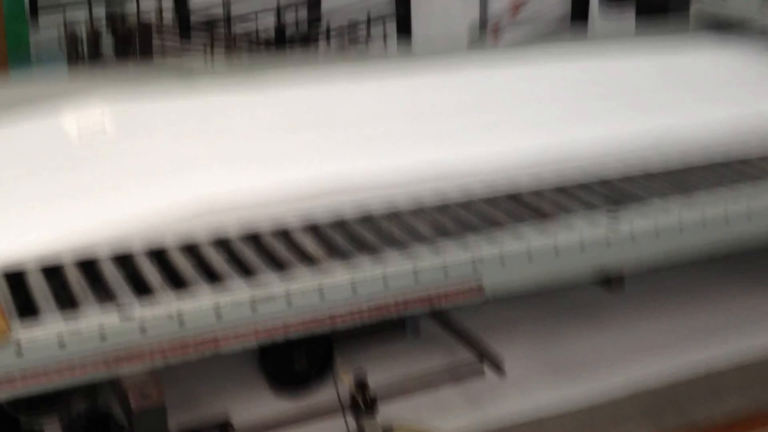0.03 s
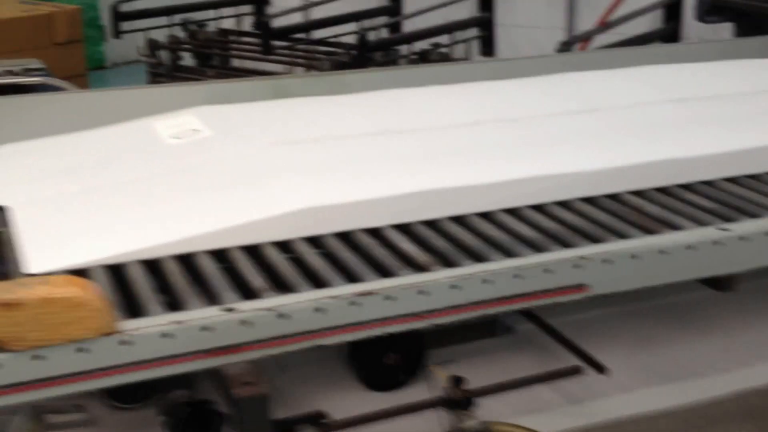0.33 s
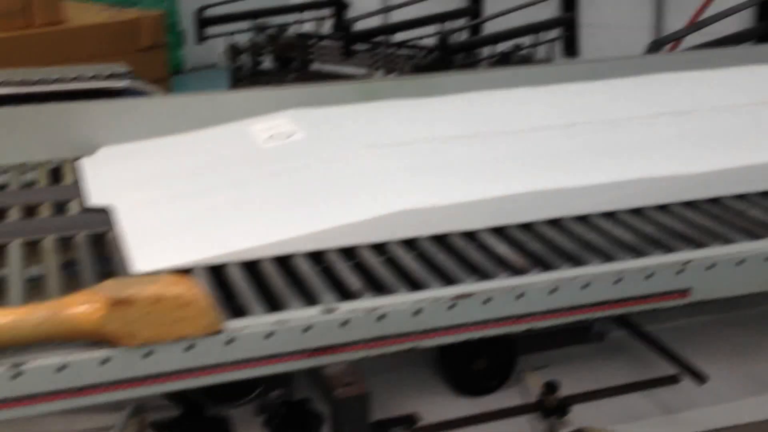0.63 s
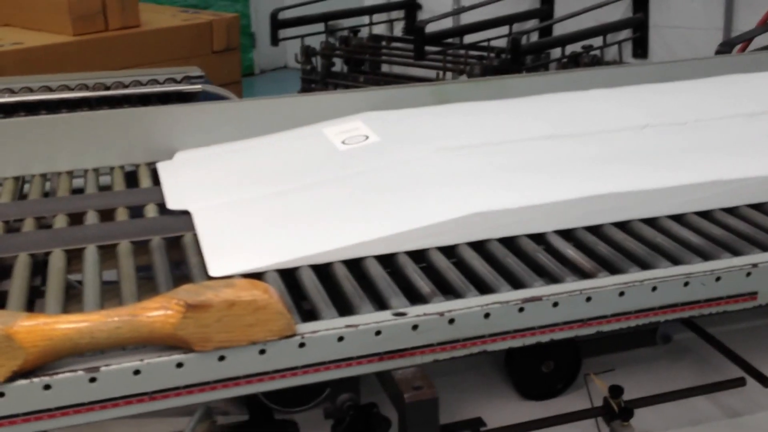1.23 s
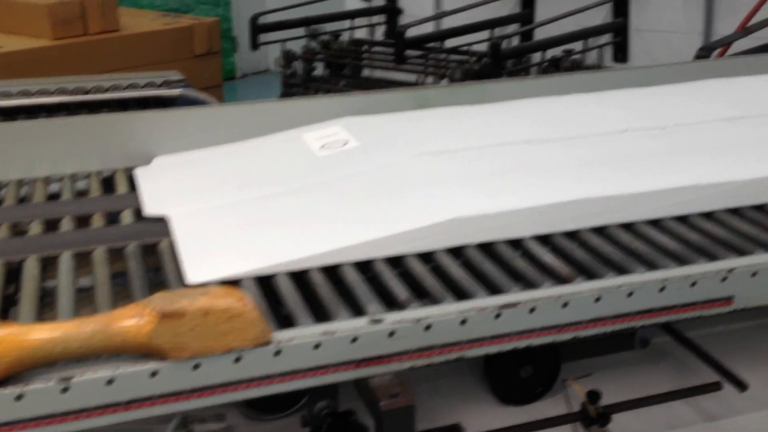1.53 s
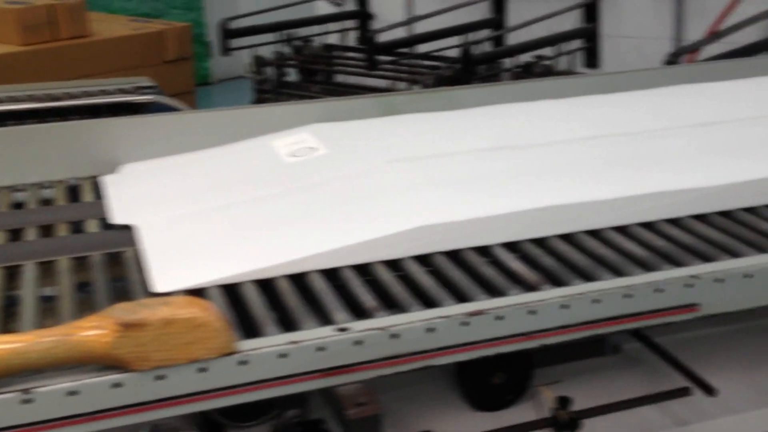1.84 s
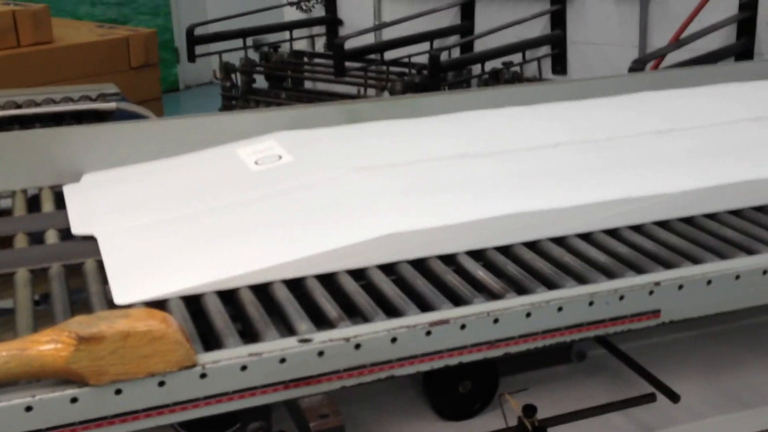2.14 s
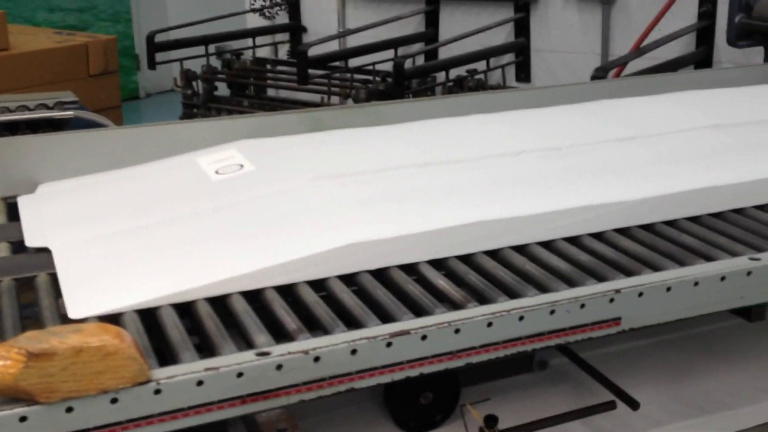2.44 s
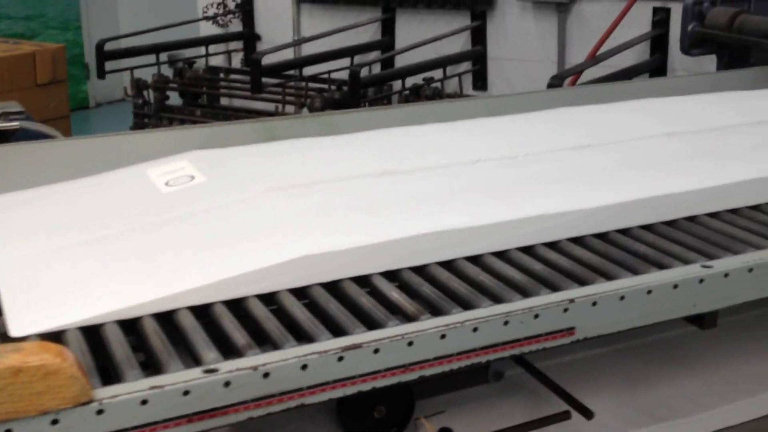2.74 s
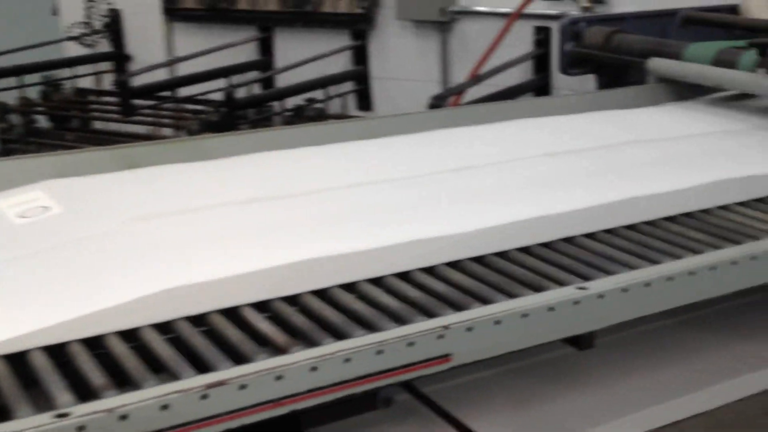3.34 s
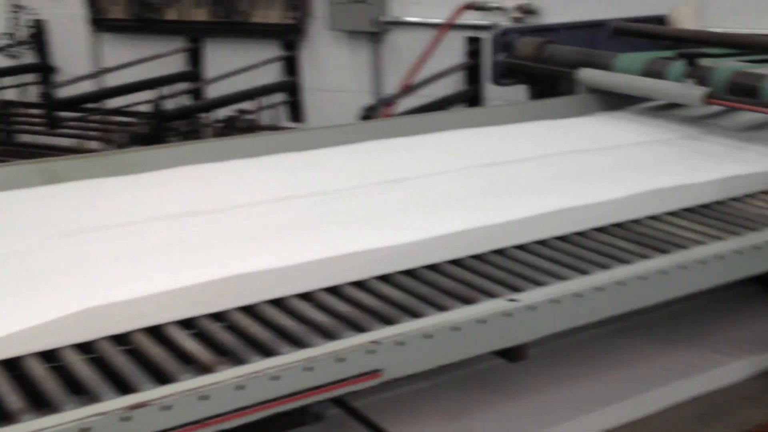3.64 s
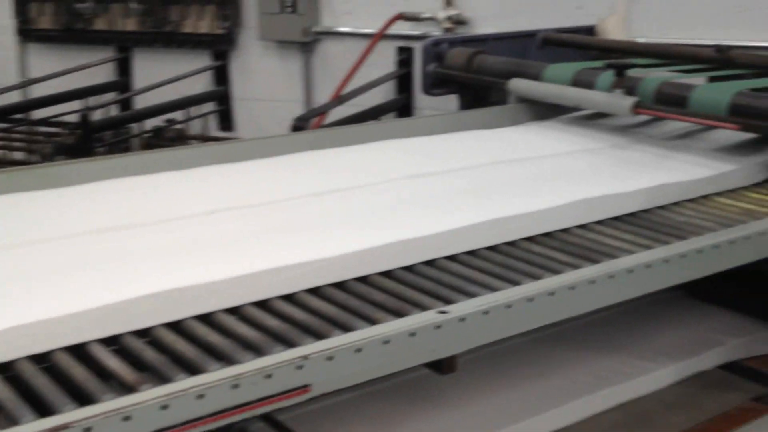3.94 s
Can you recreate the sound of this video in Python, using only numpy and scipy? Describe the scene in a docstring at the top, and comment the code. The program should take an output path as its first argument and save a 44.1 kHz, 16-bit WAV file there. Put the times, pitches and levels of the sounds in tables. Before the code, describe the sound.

A paper folding machine runs with a rhythmic steel clack over rattling rollers.

```python
"""A print shop, one microphone beside the roller table of a paper folding machine.
It takes a sheet every 0.6 s: a dry snap, then a clatter of ringing steel, each with a swish of paper.
Sheet edges flick against the rollers, which rush, tick and rattle throughout over the drive's hum.
Past the middle a low fluttering rumble swells, with dull knocks and soft bumps."""
import sys
import numpy as np
from scipy import signal
from scipy.fft import rfft, irfft
from scipy.io import wavfile

SR = 44100
rng = np.random.default_rng(int(sys.argv[2]) if len(sys.argv) > 2 else 0)


def log_audio(samples):
    """Write samples as a 16-bit WAV file to the path given in sys.argv[1]."""
    # one column per channel
    frames = np.atleast_2d(samples).T
    # limit to full scale, then quantise
    limited = np.clip(frames, -1, 1)
    pcm = np.round(limited * 32767).astype(np.int16)
    wavfile.write(sys.argv[1], SR, pcm)


N = 176400
T = np.arange(N) / SR
ATTACK_S = 0.00089


def from_db(db):
    """Decibels to gain."""
    return 10 ** (np.asarray(db) / 20)


def rms_one(x):
    """Scale to unit rms."""
    return x / np.sqrt(np.mean(x ** 2) + 1e-20)


def noise(colour):
    """Unit-rms noise with the given spectrum."""
    hz, db = np.transpose(colour)
    bins_hz = np.maximum(np.arange(N // 2 + 1) * SR / N, 1)
    gain = from_db(np.interp(np.log(bins_hz), np.log(hz), db))
    return rms_one(irfft(rfft(rng.standard_normal(N)) * gain, N))


def drift(rate_hz):
    """Unit-rms random wander, mostly slower than rate_hz."""
    bins_hz = np.arange(N // 2 + 1) * SR / N
    return rms_one(irfft(rfft(rng.standard_normal(N)) / (1 + (bins_hz / rate_hz) ** 2), N))


def impulses(times, db):
    """One impulse for each contact."""
    hits = np.zeros(N)
    np.add.at(hits, np.clip((times * SR).astype(int), 0, N - 1), from_db(db))
    return hits


def dying(hits, decay_s):
    """Envelope that jumps at each hit and falls to 1/e in decay_s."""
    power = signal.lfilter([1], [1, -np.exp(-2 / (decay_s * SR))], hits ** 2 + 1e-18)
    pole = np.exp(-1 / (ATTACK_S * SR))
    return np.sqrt(signal.lfilter([1 - pole], [1, -pole], power))


def burst(hits, colour, decay_s, tail_s, tail_db, grain_db):
    """A grainy crack followed by its smooth tail in the room."""
    crack = rms_one(noise(colour) * from_db(grain_db * drift(500))) * dying(hits, decay_s)
    return crack + from_db(tail_db) * noise(colour) * dying(hits, tail_s)


# Rollers and belts, from beside the table: (frequency [Hz], level [dB])
ROLLER_SPECTRUM = [(90,-13),(130,-2.5),(235,2),(350,-1.5),(440,-5),(750,-6.5),(1040,-3.5),(1250,-5),(1900,-1),(2900,-1),(3700,-4),(4400,-13.5),(5300,-7.5),(6400,-3),(7600,-2.5),(8600,-3),(9100,-12.5),(10400,-15.5),(12200,-8.5),(13200,-22.5),(15200,-21)]

def rollers(ticks_per_s=70, waver_db=0.6):
    """Running rollers and belts make a steady rush with many small dry ticks."""
    tick_hits = 1.0 * (rng.random(N) < ticks_per_s / SR)
    rush = from_db(-20.5 + waver_db * drift(13)) * noise(ROLLER_SPECTRUM)
    ticks = dying(tick_hits, decay_s=0.0032) * noise(ROLLER_SPECTRUM)
    return rush + from_db(-29) * rms_one(ticks)


# Tones of the drive: (frequency [Hz], level [dB])
DRIVE_TONES = [(302,-38.5),(981,-44)]

def drive_hum(pitch_waver=0.0064, waver_db=3):
    """The drive hums under the rollers, each tone wavering in level and pitch."""
    hum = 0
    for hz, db in DRIVE_TONES:
        level = from_db(waver_db * drift(2.7))
        phase = 2 * np.pi * hz * np.cumsum(1 + pitch_waver * drift(12.1)) / SR
        hum += from_db(db) * rms_one(level * np.sin(phase))
    return hum


def roller_pings(times, levels_db, centre_hz=2666, spread_octaves=0.28, t60_s=0.093):
    """Each touch rings a different roller, briefly and at its own pitch."""
    pings = np.zeros(N + SR)
    age = T[:int(t60_s * SR)]
    decay = np.exp(-np.log(1000) * age / t60_s)
    pitches = centre_hz * 2 ** (spread_octaves * np.clip(rng.standard_normal(len(times)), -2, 2))
    for start, db, hz in zip((times * SR).astype(int), levels_db, pitches):
        pings[start:start + len(age)] += from_db(db) * decay * np.sin(2 * np.pi * hz * age)
    return pings[:N]


def roller_rattle():
    """Loose rollers rattle at random, more often under a passing sheet."""
    pings_per_s = 45 * (1 + rms_one(sliding()))
    times = T[rng.random(N) < pings_per_s / SR]
    levels_db = 2 * rng.standard_normal(len(times))
    return from_db(-31) * rms_one(roller_pings(times, levels_db))


# Snaps, half a cycle from the steel clatter: (time [s], level [dB])
SNAP_HITS = [(.277,-2.5),(.8777,-2.5),(1.4717,-2),(2.0817,-1.5),(2.6676,-1.5),(3.2696,-1),(3.8687,-1)]
# A snap at the microphone: (frequency [Hz], level [dB])
SNAP_SPECTRUM = [(400,-2.5),(2600,0.5),(4400,-13),(7800,7),(9600,-8),(11200,0.5),(13000,-3.5),(15200,-12)]

def snaps():
    """One bright, unpitched snap for each sheet."""
    hits = impulses(*np.transpose(SNAP_HITS))
    snap = burst(hits, SNAP_SPECTRUM, decay_s=0.02, tail_s=0.074, tail_db=-9.5, grain_db=3.5)
    return from_db(-11) * snap


# The two slides of each cycle: (first peak [s], rise [s], fall [s], level [dB])
PAPER_SLIDES = [(0.299,0.036,0.1,-21.5),(0.676,0.083,0.061,-20.5)]

def sliding(cycle_s=0.598):
    """How strongly paper is sliding: two bell-shaped swells a cycle."""
    power = 0
    for first_peak, rise, fall, db in PAPER_SLIDES:
        from_peak = (T - first_peak + cycle_s / 2) % cycle_s - cycle_s / 2
        width = np.where(from_peak < 0, rise, fall)
        swell = from_db(db) * np.exp(-0.5 * (from_peak / width) ** 2)
        power += swell ** 2
    return np.sqrt(power)


# Sliding paper: (frequency [Hz], level [dB])
PAPER_SPECTRUM = [(300,-14.5),(1500,-4.5),(2200,1.5),(3300,1),(4400,-9),(6500,-2.5),(8400,-4.5),(15000,-30)]

def paper_swish(grain_db=1.8):
    """Sheets slide past the microphone in uneven swishes."""
    return sliding() * rms_one(noise(PAPER_SPECTRUM) * from_db(grain_db * drift(41)))


# Sheet edges meeting the rollers: (time [s], level [dB])
FLICK_HITS = [(0.304,3),(1.262,4),(2.068,-2),(2.455,-1),(3.087,1),(3.344,-3),(3.618,-2),(3.691,-1),(3.938,-1.5)]
# The slap of an edge: (frequency [Hz], level [dB])
FLICK_SPECTRUM = [(1200,-12),(2500,-0.5),(3300,-1.5),(5000,-19)]

def edge_flicks(rollers_hit=4, slap_s=0.018):
    """A sheet's edge slaps down and rings a few rollers in quick succession."""
    hits = impulses(*np.transpose(FLICK_HITS))
    slap = from_db(-17.5) * noise(FLICK_SPECTRUM) * dying(hits, slap_s)
    times, db = np.repeat(FLICK_HITS, rollers_hit, axis=0).T
    touches = times + slap_s * rng.random(len(times))
    return slap + roller_pings(touches, db - 25.5)


# Steel contacts of the feed: (time [s], crack level [dB], ring level [dB])
FEED_CONTACTS = [(0.371,-25,-5),(0.546,-2.5,0),(0.558,-1,6.5),(0.574,0,-4),(.658,-4,2),(.968,-22,-5.5),
                 (1.138,-16,-5),(1.154,0,-8),(1.165,-4,-14),(1.181,-3,-13),(1.231,-14,2.5),(1.257,-16,-2),(1.270,-10,-8),(1.294,-6,-15),
                 (1.739,-3.5,-12),(1.759,-6,-8),(1.767,0,-1.5),(1.858,-9,2),(1.865,-12,-7),(1.884,-8,-5),
                 (2.344,-3.5,3),(2.368,0.5,-11),(2.431,-3,4),(2.459,-1.5,-17),
                 (2.941,-4,0),(2.956,-3,2.5),(2.972,-0.5,-8),(3.021,-4,-5),(3.061,-2,-2),
                 (3.551,-1.5,-1),(3.559,0.5,-9),(3.58,-4,-11),(3.626,-12,-3),(3.660,-13,1),(3.696,-4,-8)]
# The crack of a contact: (frequency [Hz], level [dB])
CLACK_SPECTRUM = [(250,-3.5),(3400,0),(4400,-12),(5600,-1.5),(8400,5),(9200,-6.5),(12300,-5),(13200,-9),(15200,-16)]

def steel_clacks():
    """Steel parts strike with a dry crack, in a cluster for each sheet."""
    times, db, _ = np.transpose(FEED_CONTACTS)
    hits = impulses(times, db)
    clack = burst(hits, CLACK_SPECTRUM, decay_s=0.013, tail_s=0.069, tail_db=-11, grain_db=0.5)
    return from_db(-11) * clack


# Modes of the struck steel: (frequency [Hz], level [dB], time to fall 60 dB [s])
STEEL_MODES = [(5696,-1,.11),(7285,-8,.08),(8140,-4,.06),(8295,-3,.06),(8570,-4,.05),(9523,-6,.08),(9921,-12,.08)]

def steel_ring(idle_db=-18, blur_rad=1.0):
    """The loose steel rings unsteadily, with a new mix of modes after each blow, and faintly between."""
    times, _, ring_db = np.transpose(FEED_CONTACTS)
    ringing = 0
    for hz, mode_db, t60_s in STEEL_MODES:
        blows = impulses(times, ring_db + 2 * rng.standard_normal(len(times)))
        envelope = np.hypot(dying(blows, t60_s / np.log(1000)), from_db(idle_db))
        tone = np.sin(2 * np.pi * hz * T + blur_rad * drift(45))
        flicker = from_db(3 * drift(80))
        ringing += from_db(mode_db - 17.5) * envelope * tone * flicker
    return ringing


# Course of the rumble: (time [s], level [dB])
RUMBLE_SWELL = [(0,-49),(1.6,-29.5),(2.05,-38),(2.32,-29),(2.355,-22),(2.40,-24.5),(2.45,-38),(2.62,-34),(2.73,-18.5),(2.89,-21),(3.08,-20),(3.16,-24),(3.65,-32.5)]
# The rumble at the microphone: (frequency [Hz], level [dB])
RUMBLE_SPECTRUM = [(70,-29),(150,1),(320,2.5),(430,-2.5),(1000,-2),(3000,-17.5),(8000,-43)]

def rumble(flutter_hz=27, flutter_db=1.5):
    """A low fluttering rumble comes up from under the rollers, then eases."""
    level = from_db(np.interp(T, *np.transpose(RUMBLE_SWELL)))
    return level * rms_one(noise(RUMBLE_SPECTRUM) * from_db(flutter_db * drift(flutter_hz)))


# Knocks within the rumble: (time [s], level [dB])
KNOCK_HITS = [(2.347,-7),(2.944,-0.5),(2.984,0.5),(3.037,0.5)]
# A dull knock: (frequency [Hz], level [dB])
KNOCK_SPECTRUM = [(200,-27),(720,0),(1150,2),(2600,-22)]

def knocks():
    """A few short, dull knocks as the rumble swells."""
    hits = impulses(*np.transpose(KNOCK_HITS))
    return from_db(-14) * noise(KNOCK_SPECTRUM) * dying(hits, decay_s=0.016)


# Soft low bumps: (time [s], level [dB])
BUMP_HITS = [(2.375,3.5),(2.765,3.5),(3.078,6),(3.384,4.5),(3.431,4.5)]

def bumps(hz=280.5, t60_s=0.13):
    """Soft bumps set one low mode ringing."""
    hits = impulses(*np.transpose(BUMP_HITS))
    radius, angle = from_db(-60 / (t60_s * SR)), 2 * np.pi * hz / SR
    mode = signal.lfilter([0, np.sin(angle)], [1, -2 * radius * np.cos(angle), radius ** 2], hits + 1e-18)
    return from_db(-22) * mode


def scene():
    """The whole machine in mono, heard from beside the roller table."""
    feed = steel_clacks() + steel_ring() + snaps() + paper_swish() + edge_flicks()
    running = rollers() + roller_rattle() + drive_hum()
    lows = rumble() + knocks() + bumps()
    return (feed + running + lows)[None]


def record(dry, start_s=0.134, low_cut_hz=126, high_cut_hz=15350, ceiling=1.3):
    """The sound sets in abruptly; the microphone drops the bass, rounds the peaks and cuts the top."""
    low_cut = signal.butter(4, low_cut_hz, "high", fs=SR, output="sos")
    high_cut = signal.ellip(12, 0.1, 80, high_cut_hz, fs=SR, output="sos")
    age = np.maximum(T - start_s, 0)
    onset = 1 - np.exp(-age / ATTACK_S)
    settling = from_db(-0.7 * np.exp(-age / 0.66))   # the level begins a little low and comes up
    thinned = signal.sosfilt(low_cut, dry) * onset * settling
    return signal.sosfilt(high_cut, ceiling * np.tanh(thinned / ceiling))


dry = scene()
out = record(dry)
log_audio(out)
```